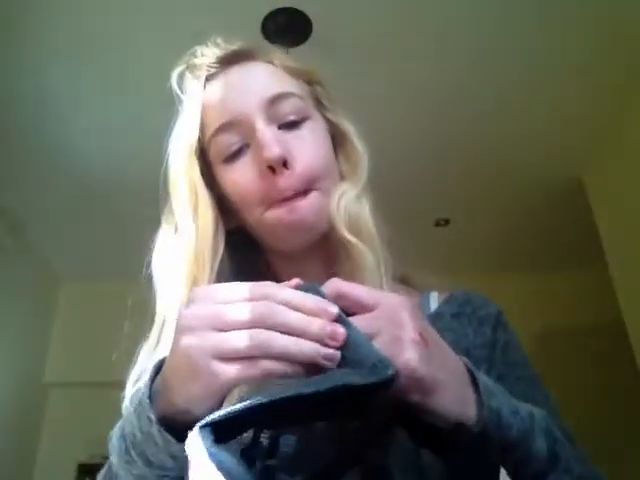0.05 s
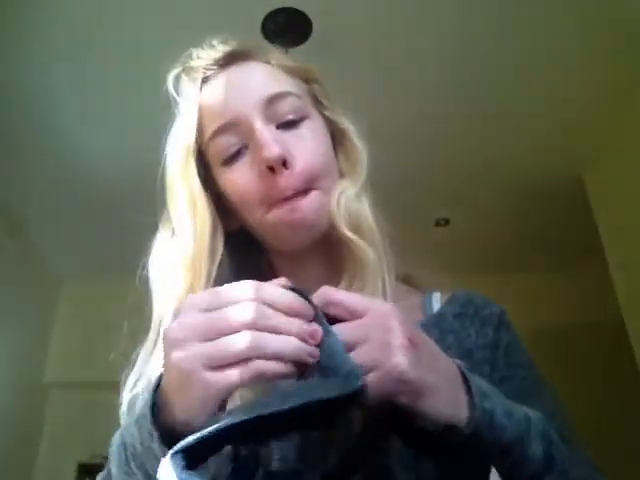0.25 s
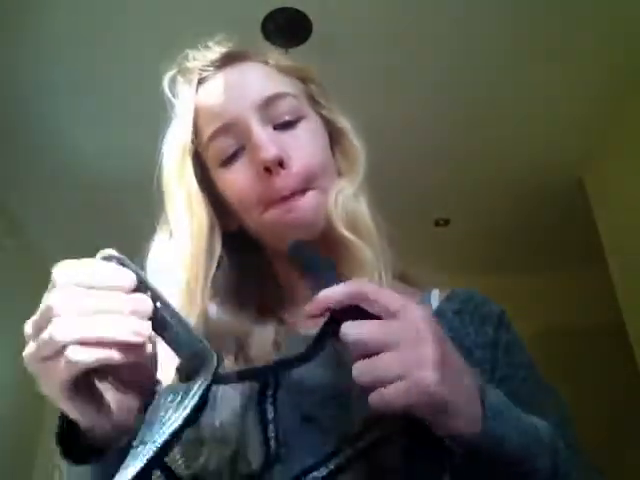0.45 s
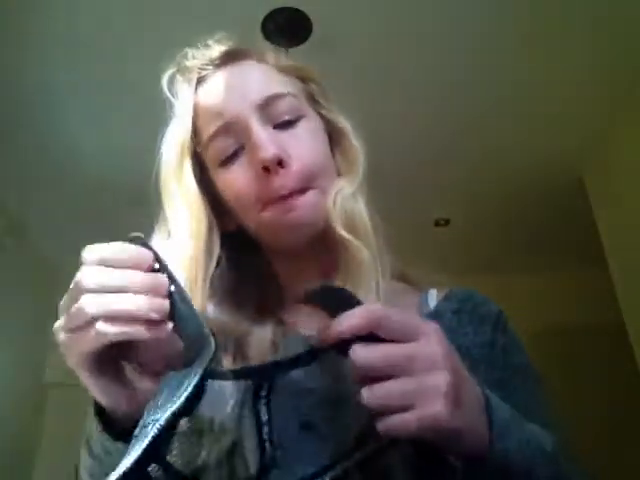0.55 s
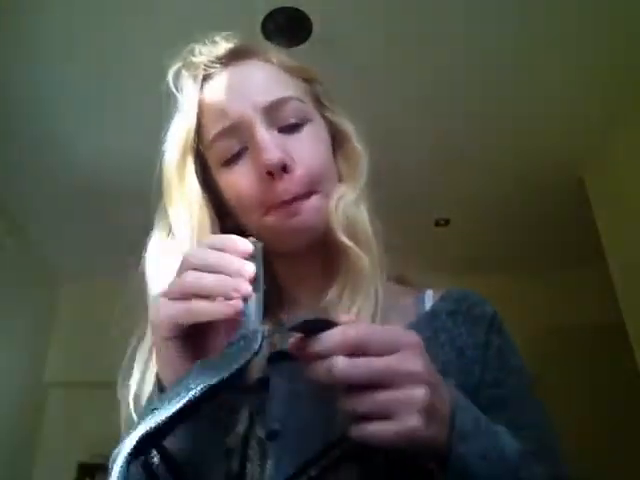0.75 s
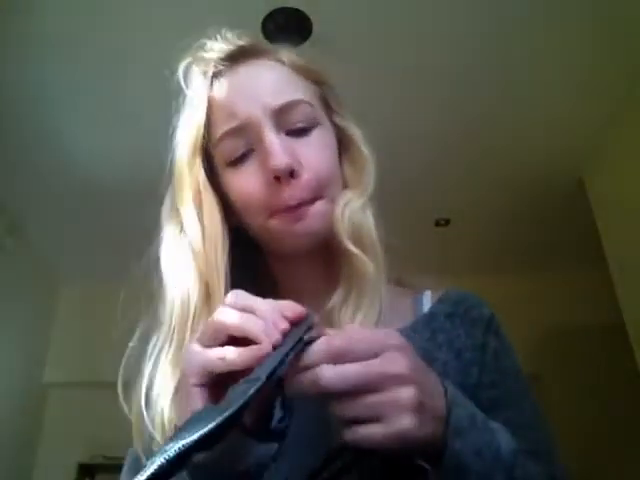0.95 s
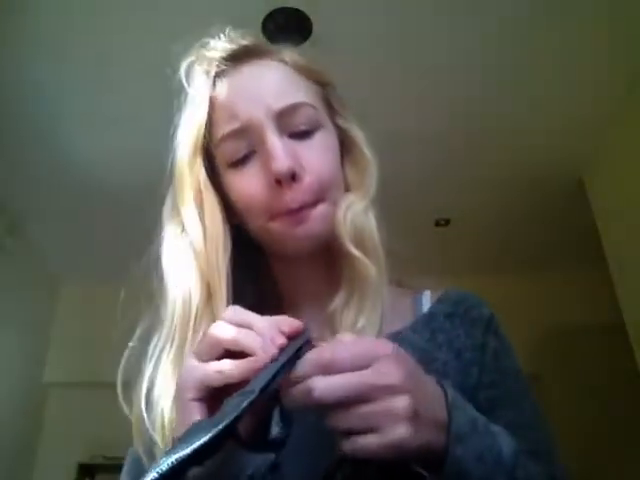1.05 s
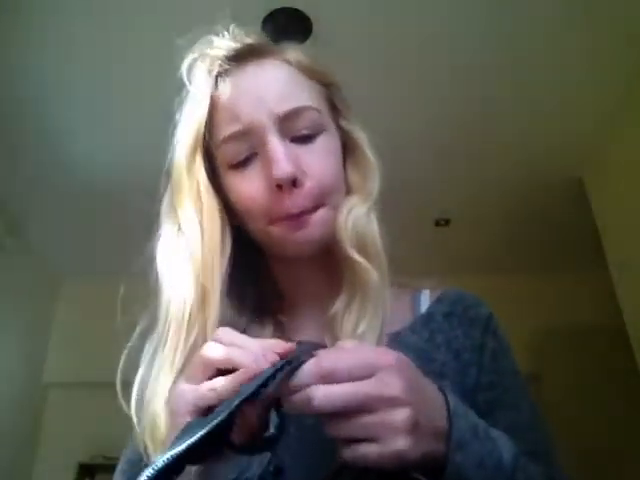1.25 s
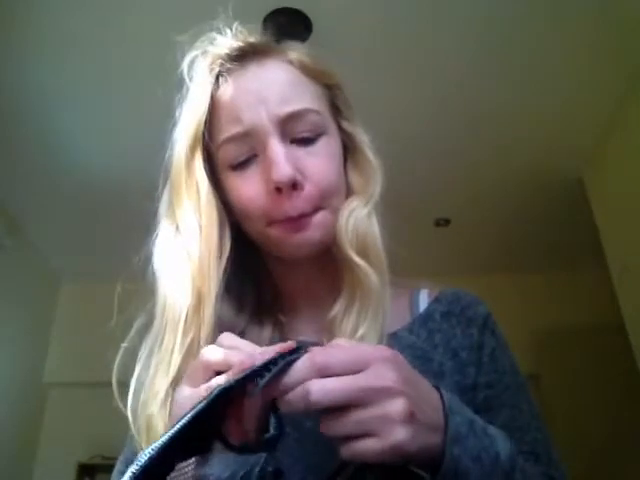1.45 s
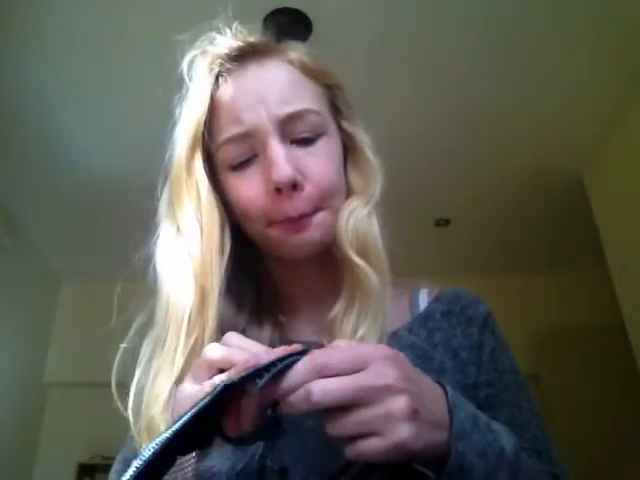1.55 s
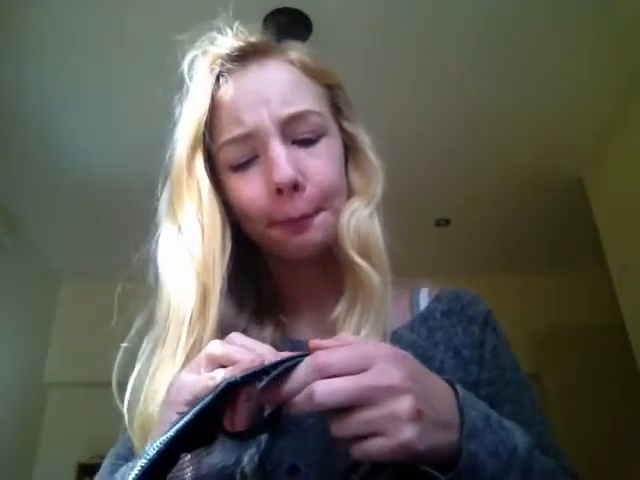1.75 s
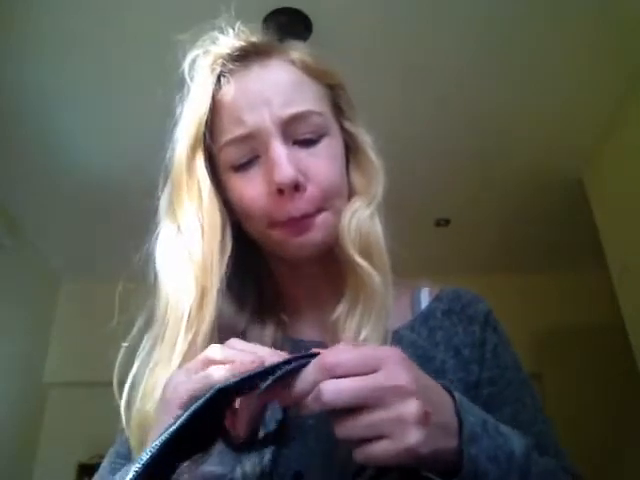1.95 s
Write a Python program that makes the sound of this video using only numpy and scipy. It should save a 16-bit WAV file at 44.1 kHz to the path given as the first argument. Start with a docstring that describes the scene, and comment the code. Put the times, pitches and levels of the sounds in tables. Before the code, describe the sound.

Sharp clicks in quick succession as garment fasteners pop open, then faint finger ticks.

```python
"""Small bare room: a row of small fasteners on a garment is pulled apart by hand, close to the mic.
Each lets go with a sharp crack, chatters briefly and jerks the taut cloth; the room answers.
Fingers pick at a fastener with faint ticks, once before the cracks and several times after.
A low fan-like whirr and microphone hiss run throughout."""
import sys
import numpy as np
from scipy import signal
from scipy.fft import rfft, irfft, next_fast_len
from scipy.io import wavfile
from scipy.ndimage import uniform_filter1d

SR = 44100
rng = np.random.default_rng(int(sys.argv[2]) if len(sys.argv) > 2 else 0)


def wav_record(signal):
    """Record a signal, one row per channel, as 16-bit PCM in the file named by sys.argv[1]."""
    frames = np.transpose(np.atleast_2d(signal))
    bounded = np.clip(frames, -1, 1)
    # unit amplitude maps onto the largest positive 16-bit level
    quanta = np.round(bounded * 32767).astype(np.int16)
    wavfile.write(sys.argv[1], SR, quanta)


N = 88200


def amp(db):
    """Decibels to gain."""
    return 10 ** (np.asarray(db) / 20)


def along(points, hz):
    """Interpolate (f/Hz, value) points on a log-frequency axis."""
    f, values = np.transpose(points)
    return np.interp(np.log(hz + 1), np.log(f + 1), values)


def bell(f, hz, octaves):
    """Bump of height 1 on a log-frequency axis."""
    return np.exp(-(np.log2((f + 1) / hz) / octaves) ** 2)


def ringing(modes, f):
    """Causal response of (f/Hz, width/Hz, level/dB) resonances."""
    return sum(amp(db) * 1j * f * width / (hz * hz - f * f + 1j * f * width) for hz, width, db in modes)


def filtered(x, response):
    """Apply a complex frequency response."""
    size = next_fast_len(len(x) + 8192)
    return irfft(rfft(x, size) * response(np.fft.rfftfreq(size, 1 / SR)), size)[:len(x)]


def noise(response):
    """Coloured noise, rms 1."""
    x = filtered(rng.standard_normal(N), response)
    return x / np.sqrt(np.mean(x ** 2) + 1e-20)


def placed(start_s, sound):
    """Full-length track with the sound at start_s."""
    track = np.zeros(N)
    part = track[round(start_s * SR):][:len(sound)]
    part += sound[:len(part)]
    return track


def whirr():
    """Low fan-like noise that ducks at the cracks and slowly returns, plus narrow hums."""
    # f/Hz, relative density/dB
    spectrum = [(18, -66), (30, -39), (64, -38), (87, -15), (113, -14.5), (129, -15), (178, -3),
                (209, -10.5), (241, -1), (299, -9), (625, -13), (963, -12.5), (1350, -23.5), (2200, -33),
                (2860, -31), (4840, -120)]
    # preset curve for the recorder's automatic gain ducking and recovering: t/s, level/dB
    ducking = [(0, -53.5), (.3, -58.5), (.65, -56.5), (1.0, -55), (1.5, -54), (2.0, -56)]
    # noise bands: f/Hz, half-width/Hz, level/dB
    hums = [(140.9, 11.8, -66.5), (191.7, 16.4, -60.5), (236.5, 6.3, -62), (401.2, 7.9, -73),
            (1272, 5.6, -80.5)]
    level_db = np.interp(np.arange(N) / SR, *np.transpose(ducking))
    rush = amp(level_db) * noise(lambda f: amp(along(spectrum, f)))
    hum = sum(amp(db) * noise(lambda f: 1 / (1 + ((f - hz) / width) ** 4)) for hz, width, db in hums)
    return rush + hum


def hiss(level_db=-64.5):
    """Steady microphone noise."""
    # f/Hz, relative density/dB
    spectrum = [(800, -37), (2000, -2.5), (3000, -3.5), (5000, -3), (8000, -3), (12000, -3.5),
                (15000, -4.5)]
    return amp(level_db) * noise(lambda f: amp(along(spectrum, f)))


def crack(start_s, chatter_db, chatter_t60_s, smooth_hz=1210):
    """Force of a sharp release, then a dying chatter of tiny contacts; whitened to unit gain."""
    t = np.arange(SR // 10) / SR
    chatter = rng.standard_normal(len(t)) * amp(-60 * t / chatter_t60_s)
    force = amp(chatter_db) * chatter / np.linalg.norm(chatter)
    force[0] = 1  # the release
    spectrum = rfft(placed(start_s, force))
    band_power = uniform_filter1d(abs(spectrum) ** 2, int(smooth_hz * N / SR))
    return irfft(spectrum / np.sqrt(band_power), N)


def fingers(chatter_db=7):
    """Faint ticks and scrapes ring a fastener pinched between the fingers."""
    # t/s, level/dB, chatter t60/s
    touches = [(.0283, -38.5, 0.026), (0.9479, -31.5, 0.16), (1.0404, -26, 0.0038), (1.103, -38.5, 0.017),
               (1.6874, -35, .025)]
    # pinched fastener: f/Hz, width/Hz, level/dB
    modes = [(1785, 220, 7.5), (3260, 490, -4.5), (3840, 550, 3), (8070, 1200, 4.5)]
    # muffling by the fingers: f/Hz, gain/dB
    muffling = [(9000, 1.5), (10500, -4.5), (15000, -9)]
    force = sum(amp(db) * crack(start_s, chatter_db, t60_s) for start_s, db, t60_s in touches)
    ticks = filtered(force, lambda f: ringing(modes, f) * amp(along(muffling, f)))
    return ticks + room(ticks, tail_db=-1)


def room(x, tail_db, predelay_s=0.004, build_s=0.001):
    """Echoes off near surfaces and a diffuse tail; no direct sound."""
    # delay/s, level/dB
    echoes = [(.0057, -22.5), (0.0089, -21), (0.0175, -28)]
    # tail decay: f/Hz, t60/s
    decay = [(300, 0.59), (2000, 0.45), (8000, 0.35), (15000, 0.5)]
    # tail colour: f/Hz, gain/dB
    colour = [(200, 9), (650, -4), (1100, -6.5), (1400, -5), (1800, -3), (2400, 3.5), (3800, -7), (5200, 0),
              (7500, -2), (11000, -3.5), (15000, -5)]
    hz, t, bands = signal.stft(rng.standard_normal(SR // 2), SR, nperseg=256)
    bands = bands * amp(-60 * t / along(decay, hz)[:, None])
    _, tail = signal.istft(bands, SR, nperseg=256)
    tail *= 1 - np.exp(-np.arange(len(tail)) / SR / build_s)
    tail = filtered(tail / np.linalg.norm(tail), lambda f: amp(along(colour, f)))
    diffuse = placed(predelay_s, amp(tail_db) * signal.fftconvolve(x, tail))
    return diffuse + sum(placed(delay_s, amp(db) * x) for delay_s, db in echoes)


def fasteners(cloth_lag_s=0.00018):
    """Each fastener springs free, rings with its own colour and jerks the cloth."""
    # t/s, level/dB, clack/dB, ring/dB, top treble/dB, chatter/dB, chatter t60/s, thump/dB, room tail/dB
    snaps = [(0.2109, -12.5, -4, -19, -9, -6.5, 0.0075, -22, -26),
             (.2138, 4.5, -3, 4, 0, -3, .008, -10.5, -10.5), (0.2868, -15, 7.5, -3, -3, 6, 0.011, -20, -25),
             (0.2951, -2, 3.5, -3, 3.5, -1.5, 0.0097, -6, -5.5),
             (0.3455, -4, 3.5, -8, -8, 11, .007, 0, -6.5),
             (0.3699, -5, -1, -4.5, -3.5, 3.5, 0.0074, 1, -6.5),
             (.4082, -2.5, 1, 1.5, -3.5, -4.5, 0.011, -1, -10)]
    # free fastener: f/Hz, width/Hz, level/dB
    modes = [(1166, 280, 3), (1857, 390, 4), (3110, 890, -1), (3930, 1070, 3), (5340, 2500, -9.5),
             (6780, 1300, 1.5), (7820, 2360, 2.5), (10400, 1500, -3), (12300, 1500, -16)]
    # cracks slightly dulled above 12.5 kHz: f/Hz, gain/dB
    rolloff = [(12500, 0), (13500, -3.5), (15000, -2.5)]
    out = np.zeros(N)
    for start_s, db, clack_db, ring_db, top_db, chatter_db, chatter_t60_s, thump_db, tail_db in snaps:
        def colour(f):
            peaks_db = clack_db * bell(f, hz=3550, octaves=0.42) + ring_db * bell(f, hz=7460, octaves=0.22)
            treble_db = along([(9400, 0), (10200, top_db)], f) + along(rolloff, f)
            return ringing(modes, f) * amp(db + peaks_db + treble_db)

        direct = filtered(crack(start_s, chatter_db, chatter_t60_s), colour)
        # the room gets the smoother mean of all directions
        all_round = filtered(signal.unit_impulse(N, round(start_s * SR)), colour)
        out += direct + room(all_round, tail_db) + cloth(start_s + cloth_lag_s, db + thump_db)
    return out


def cloth(start_s, gain_db, low_cut_hz=416):
    """Taut cloth goes slack with a short thump; little bass radiates."""
    # f/Hz, t60/s, level/dB
    modes = [(597, 0.008, -19.5), (1077, 0.0084, -22.5)]
    t = np.arange(SR // 20) / SR
    motion = sum(amp(db - 60 * t / t60_s) * np.sin(2 * np.pi * hz * t) for hz, t60_s, db in modes)
    radiated = signal.sosfilt(signal.butter(4, low_cut_hz, "high", fs=SR, output="sos"), motion)
    thump = placed(start_s, amp(gain_db) * radiated)
    return thump + room(thump, tail_db=-9.5)


def scene():
    """Mono sum at the microphone."""
    return (whirr() + hiss() + fingers() + fasteners())[None]


def record(dry):
    """Steep low-pass at the recorder's band limit."""
    cutoff_hz = 15050
    return signal.sosfilt(signal.ellip(10, 0.1, 70, cutoff_hz, fs=SR, output="sos"), dry)


dry = scene()
out = record(dry)
wav_record(out)
```